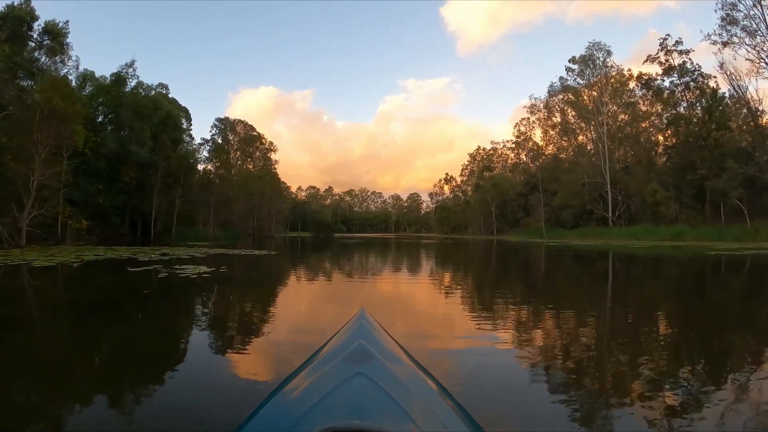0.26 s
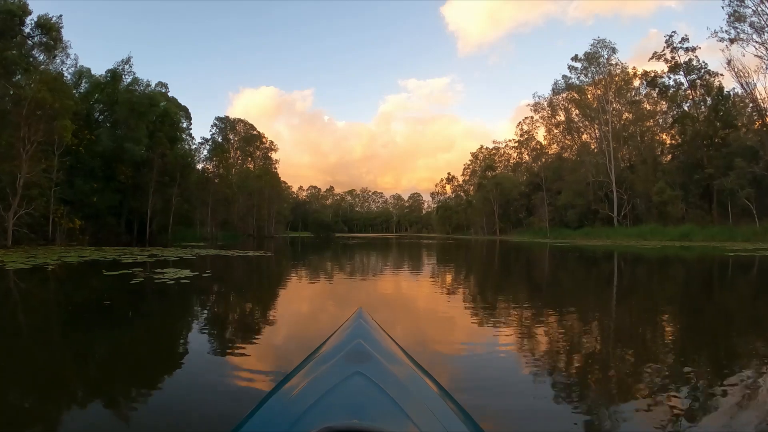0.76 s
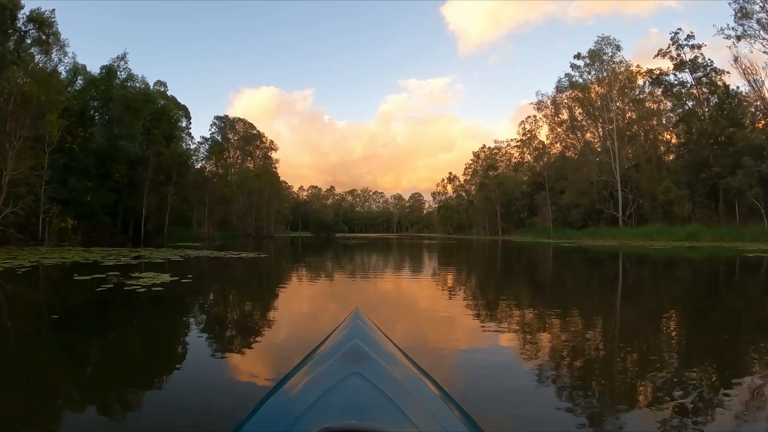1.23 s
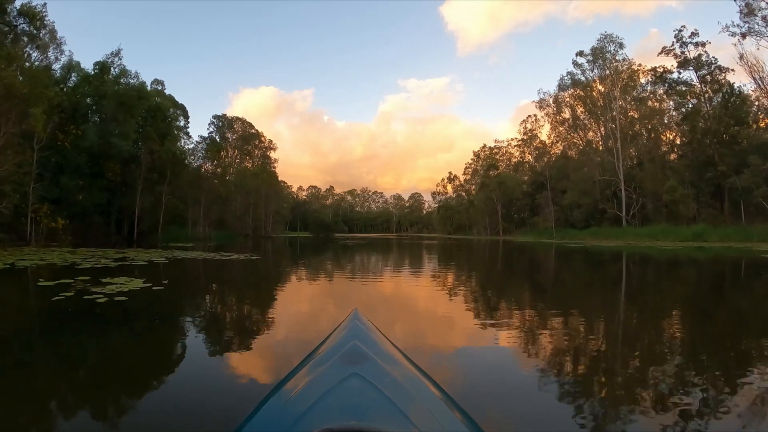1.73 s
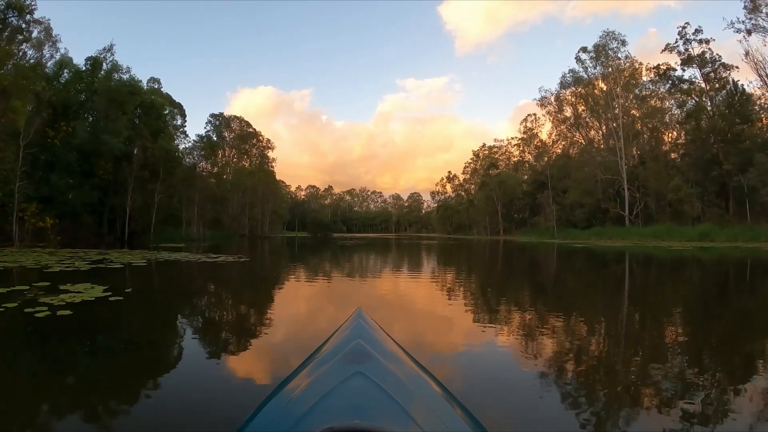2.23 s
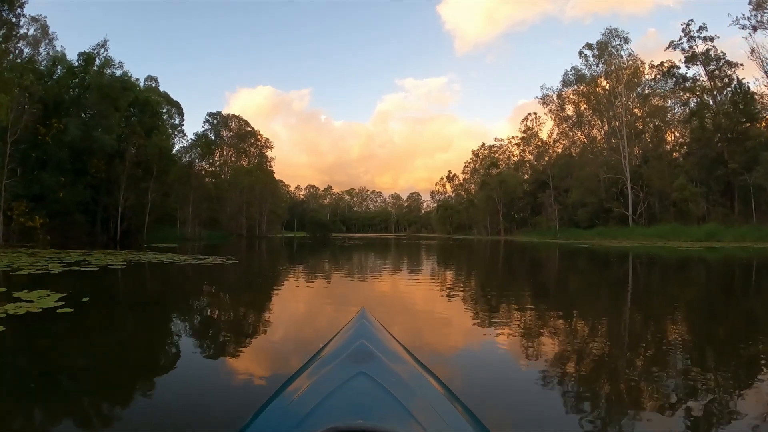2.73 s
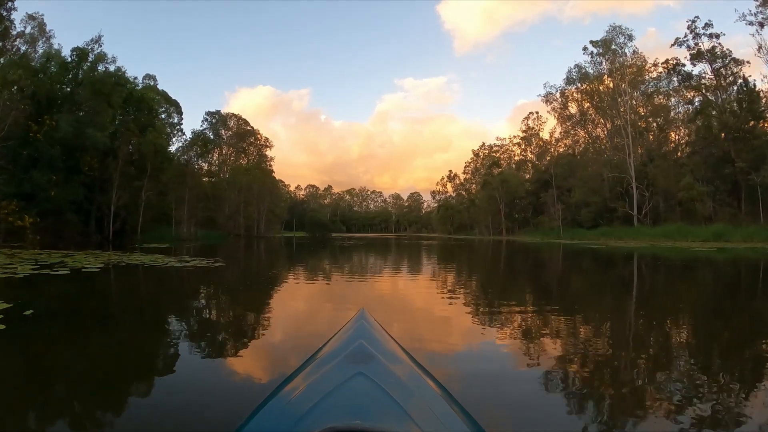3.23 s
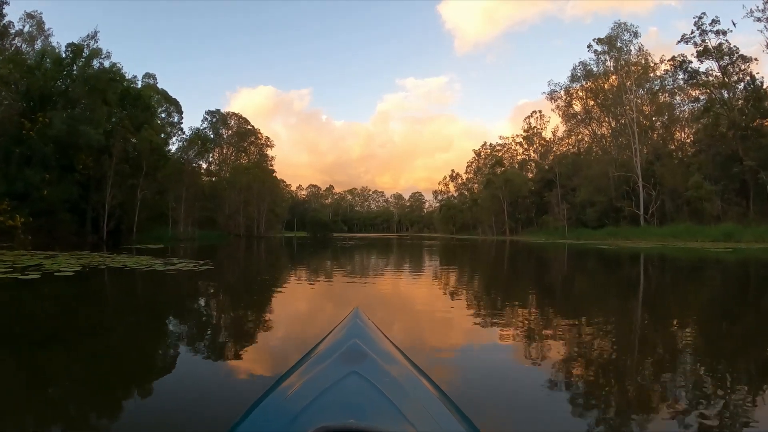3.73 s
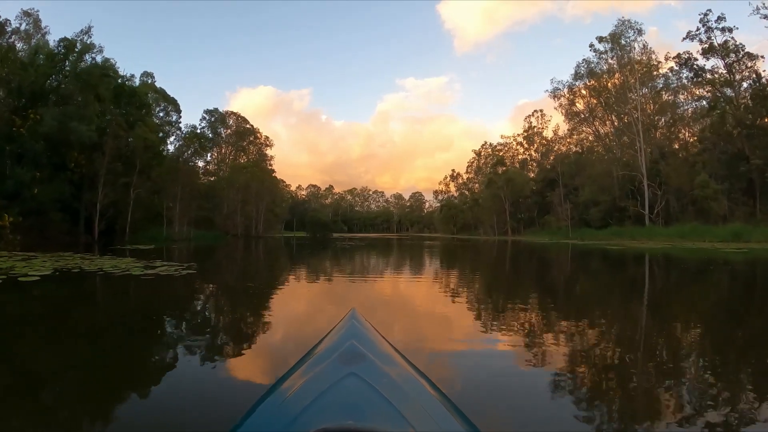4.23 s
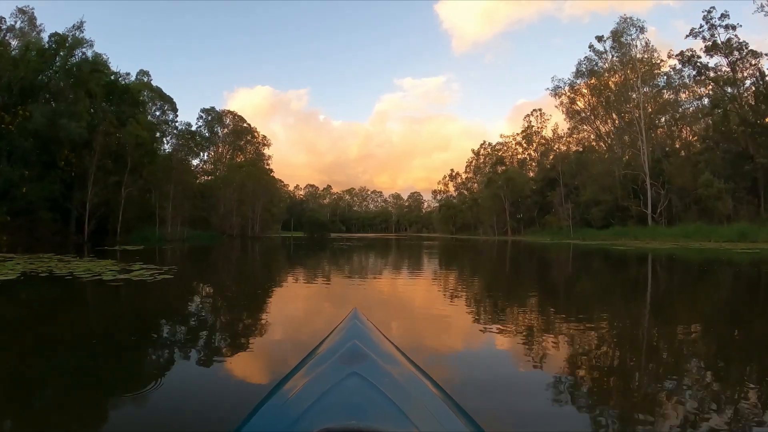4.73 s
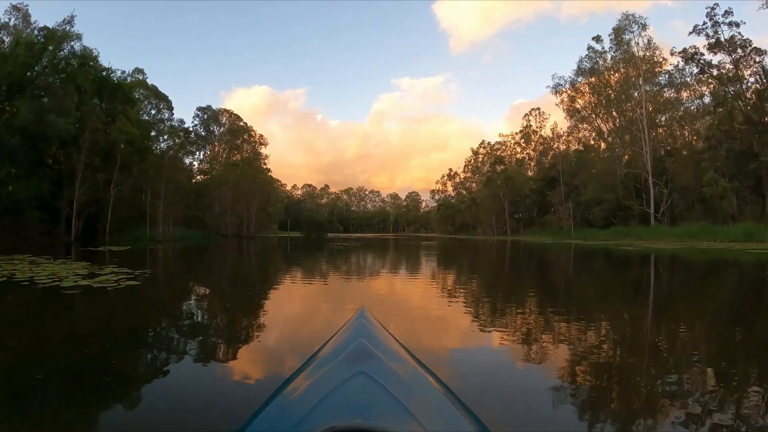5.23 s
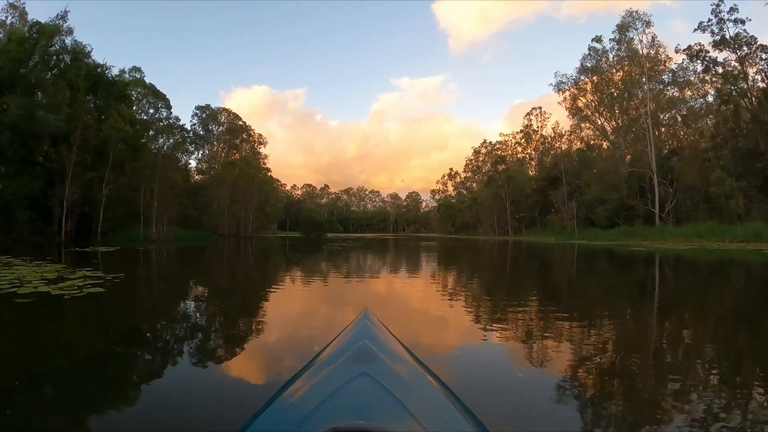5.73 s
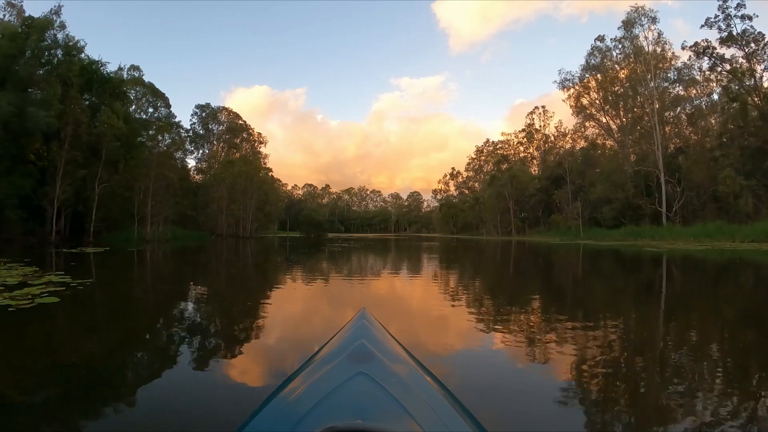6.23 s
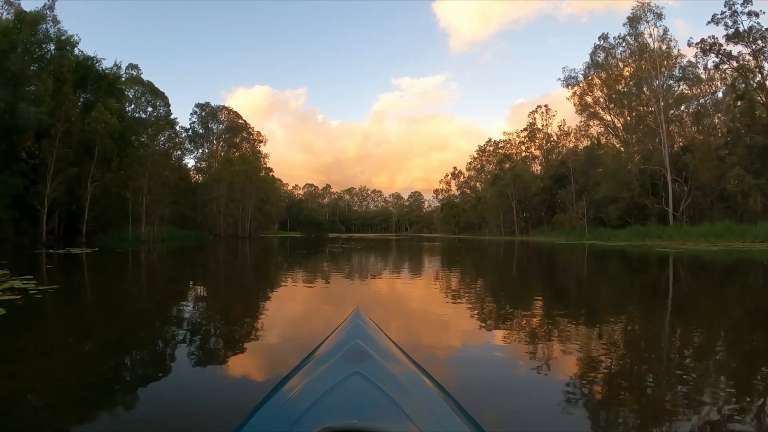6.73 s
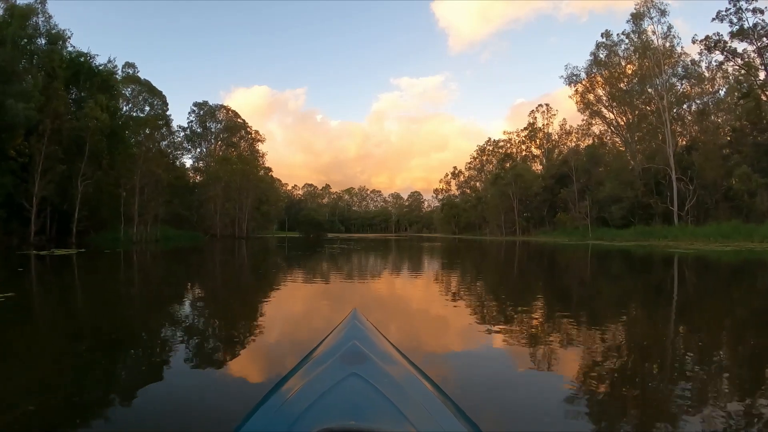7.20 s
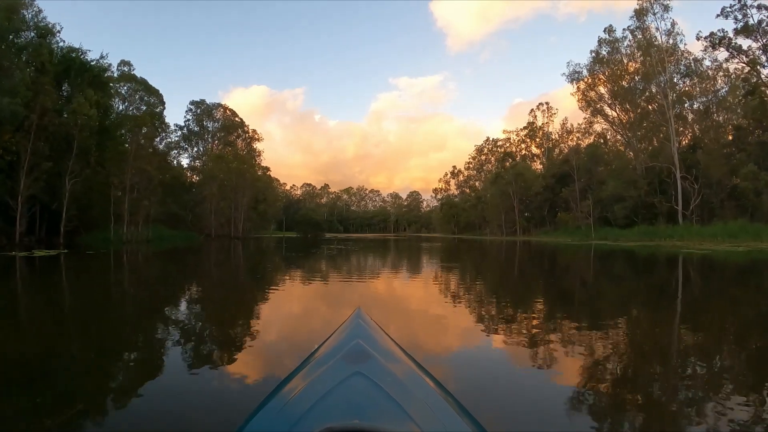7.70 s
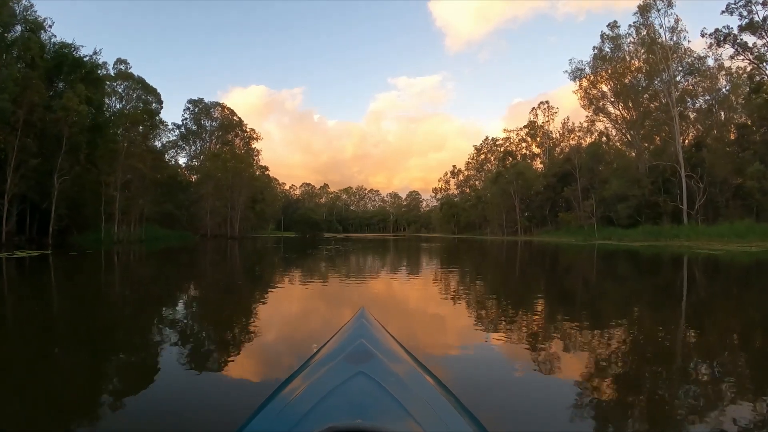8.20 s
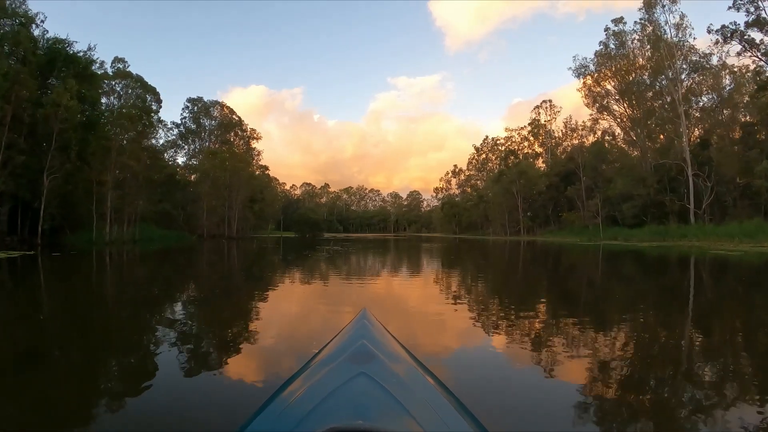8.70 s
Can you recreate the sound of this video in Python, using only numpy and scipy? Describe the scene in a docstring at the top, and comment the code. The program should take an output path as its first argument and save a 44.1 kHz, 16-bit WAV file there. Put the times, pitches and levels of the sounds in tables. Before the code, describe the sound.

A calm lake heard from a gliding kayak, close and nearly dry, over a soft low wash, faint leafy hiss and deep rumble. Small plops and gurgles open the scene around 0.3 and 1 s, while a distant parrot gives quick gliding whistles and harsh screeches until about 1.8 s, echoing from the trees. A light stroke lands at 1.75 s. Drips and fine spray trickle before a sharp, bright plop at 3.25 s, joined by more bird chirps; a faint screech follows at 4.2 s. Further crisp, bubbly strokes come at 4.5, 5.95 and 7.4 s, with drips and low sloshes against the hull between them. From 1.75 to 7.7 s a far engine wavers, its low hum rising through three gears. Dripping and a gentle slosh lead to a short stumble of hollow plastic hull knocks at 8.8 s.

```python
"""A paddle plops through the surface of a calm lake about every 1.4 s, heard from the deck of a gliding kayak.
Each trapped bubble is a fading sine that rises in pitch; splashes and wavelets are swarms of such bubbles.
Drips are tiny bubbles and puffs of noise, and near the end something bumps the hull, a set of fading tones.
A parrot screeches in gliding whistles with an echo from the trees, and a far engine climbs through its gears.
Behind it all lie a wash of shaped noise and a deep rumble."""
import sys
import numpy as np
from scipy import signal
from scipy.fft import rfft, irfft, next_fast_len
from scipy.io import wavfile
from scipy.ndimage import uniform_filter1d

SR = 44100
rng = np.random.default_rng(int(sys.argv[2]) if len(sys.argv) > 2 else 0)


def log_audio(samples):
    """Write samples as a 16-bit WAV file to the path given in sys.argv[1]."""
    # one column per channel
    frames = np.atleast_2d(samples).T
    # limit to full scale, then quantise
    limited = np.clip(frames, -1, 1)
    pcm = np.round(limited * 32767).astype(np.int16)
    wavfile.write(sys.argv[1], SR, pcm)


N = 394684  # length in samples
TIME = np.arange(N) / SR  # seconds


def gain_of(db):
    """Turns decibels into amplitude."""
    return 10 ** (np.asarray(db) / 20)


def evened(x):
    """Scales a sound to rms 1."""
    return x / np.sqrt(np.mean(x ** 2) + 1e-20)


def read(points, hz):
    """Reads a table of values by frequency, joining its points on a log-frequency axis."""
    f, value = np.transpose(points)
    return np.interp(np.log(hz + 1), np.log(f + 1), value)


def add(mix, s, sound):
    """Mixes a sound in at time s, in seconds."""
    part = mix[max(round(s * SR), 0):][:len(sound)]
    part += sound[:len(part)]


def wander(size, hz):
    """A random drift around zero, mostly slower than hz, with an rms of 1 before it is cut to size."""
    span = next_fast_len(size + SR // 2)
    f = np.fft.rfftfreq(span, 1 / SR)
    spectrum = rfft(rng.standard_normal(span)) / (1 + (f / hz) ** 4)
    return evened(irfft(spectrum))[:size]


def snap(colour, size=1024):
    """The click of water meeting water: it starts at once, has the given colour and peaks at 1."""
    log_gain = np.log(gain_of(read(colour, abs(np.fft.fftfreq(size, 1 / SR)))))
    # minimum phase puts the energy as early as this colour allows
    click = np.fft.ifft(np.exp(np.conj(signal.hilbert(log_gain)))).real
    return click / abs(click).max()


def bubble(hz, decay_ms, rise, size=4000):
    """A trapped air pocket rings and goes up in pitch (octaves per decay time) as it nears the surface."""
    t = np.arange(size) / SR
    age = t * 1000 / max(decay_ms, .1)  # in decay times
    pitch_hz = hz * 2 ** (rise * np.minimum(age, 3))
    turns = np.cumsum(pitch_hz) / SR
    onset = 1 - np.exp(-(turns / .5) ** 2)
    flow = np.sin(2 * np.pi * turns) * np.exp(-age) * onset
    return np.gradient(flow) * SR / (2 * np.pi * hz)  # pressure follows the change of flow


def grains(per_s, low_hz, high_hz, cycles, spread_db, count=28):
    """A steady random stream of small bubbles of many sizes, rms 1; each fades over a number of cycles."""
    at, pick, chance, size = rng.random((4, 20000))
    size = gain_of(spread_db * np.minimum(-np.log(1 - size), 3.5))  # many weak, few strong
    kept = chance < per_s * TIME[-1] / len(at)
    kind = np.floor(pick * count)
    out = np.zeros(N)
    for k, hz in enumerate(np.geomspace(low_hz, high_hz, count)):
        ring = bubble(hz, 1000 * cycles / hz, .04, size=1500)
        for i in np.flatnonzero((kind == k) & kept):
            add(out, at[i] * TIME[-1], size[i] * ring)
    return evened(out)


def swells(rows):
    """Amplitude of overlapping bell-shaped swells; their powers add (s, half length s, dB)."""
    t = TIME[::32]
    power = sum(gain_of(db) ** 2 * np.exp(-((t - s) / half) ** 2) for s, half, db in rows)
    return np.interp(TIME, t, np.sqrt(power))


# Bubbles trapped by the paddle and by the largest drips.
# Each row: start in seconds, approximate peak in dB, starting pitch in Hz, decay time in ms,
# snap of the surface as a share of that peak.
PLOPS = [(.079, -27, 1740, 4.5, .3), (.275, -28, 660, 3.6, .2), (.862, -30.5, 2050, 3.5, 0.49),
         (0.997, -23.5, 350, 8.5, .2), (1.034, -34, 400, 5.4, .6), (1.18, -31.5, 990, 9.9, .1),
         (1.21, -29, 510, 9.5, .1), (1.338, -30, 394, 12, .2), (1.603, -23, 1410, 7, .15),
         (1.6857, -16, 1900, 2.8, 0.22), (1.718, -22.5, 358, 8.9, 2), (1.757, -18.5, 2770, 1.9, .2),
         (1.777, -24.5, 1660, 3.5, 0.36), (2.098, -28.5, 1100, 3, .1), (3.153, -23, 4200, .8, .55),
         (3.1575, -10.5, 3700, 0.61, 0.34), (3.2313, -13.5, 1610, 2, .2), (3.237, -18.5, 2580, 1.4, 0.61),
         (3.251, -22, 1280, 5.6, .1), (3.2551, 1, 3650, .71, .17), (3.2594, -11, 1600, 2.2, 0.83),
         (3.315, -20, 637, 6.1, .1), (3.3235, -10.5, 960, 1.1, 0.13), (3.3262, -19, 684, 6.9, .1),
         (3.9175, -22, 1550, 2.3, .3), (3.97, -28, 2050, 3.3, .5), (4.349, -28.5, 1213, 10, .1),
         (4.419, -15.5, 1970, 4.2, .12), (4.4244, -19.5, 2330, 1.8, .5), (4.4765, -19.5, 347, 7.1, 1.14),
         (4.5114, -19, 1950, 2.5, .27), (4.5188, -4.5, 1970, 0.7, 0.092), (4.5188, -4.5, 1290, 0.93, .1),
         (4.5283, -12, 2300, 0.86, 0.27), (4.5294, -12, 3320, 1, .2), (4.591, -26.5, 720, 4.8, .1),
         (5.195, -30.5, 3150, 3.3, .1), (5.525, -30.5, 2150, 4, .1), (5.85, -24.5, 1620, 4.7, .3),
         (5.8783, -20, 1250, 4.3, 1.3), (5.9524, -7, 1040, 1.3, 0.42), (5.9524, -18.5, 570, 5.7, .2),
         (5.9533, -16, 4360, 1.7, 0.26), (5.9568, -11.5, 1490, 2.2, 0.88), (6.003, -19.5, 860, 2.5, 0.96),
         (6.012, -20.5, 603, 3.3, .4), (6.064, -27, 760, 5.1, 1.4), (6.4635, -22.5, 807, 1.1, 1.5),
         (6.5033, -23.5, 740, 4.5, 1.4), (6.62, -30, 1270, 5, 0.54), (6.903, -30, 1230, 5.6, .1),
         (7.296, -17.5, 328, 11.3, .1), (7.297, -20.5, 1700, 4.1, 0.34), (7.3505, -23.5, 813, 6.5, 1.2),
         (7.3837, -5.5, 1640, 2.7, .05), (7.384, -18.5, 2630, 1.5, 0.046), (7.517, -26.5, 1210, 6.2, .05),
         (8.0855, -22, 2500, 1.9, 0.48), (8.417, -24.5, 574, 5.9, .2), (8.454, -28, 1400, 1.4, 1.9),
         (8.606, -22.5, 4760, 1.7, 0.48), (8.764, -19.5, 4450, .6, 0.28)]
# Colour of a drop's snap. Each row: frequency in Hz, level in dB (only the shape counts).
SNAP = [(100, -43), (500, 8), (1500, 16.5), (4500, 7.5), (6500, -6), (8500, -54), (11000, -11),
        (15000, -65)]
PLOP_RISE = 0.022  # octaves per decay time, as a bubble nears the surface


def paddle(scatter_db=-13, scatter_s=0.0092):
    """Each cavity closes with a snap and rings; deck and blade scatter the sound."""
    out, click = np.zeros(N), snap(SNAP)
    for s, db, hz, decay_ms, share in PLOPS:
        add(out, s, gain_of(db) * bubble(hz, decay_ms, PLOP_RISE))
        add(out, s, gain_of(db) * share * click)
    t = TIME[:2048]
    scatter = rng.standard_normal(len(t)) * np.exp(-t / scatter_s) * (t > .001)
    scatter /= np.linalg.norm(scatter)
    return out + gain_of(scatter_db) * signal.oaconvolve(out, scatter)[:N]


# Paddle strokes. The last splash is faint: the hull is bumped instead.
# Each row: splash time in seconds, its half length in seconds, its rms in dB, rms of its spray in dB;
# then the trickle before it: lead in seconds, half length in seconds, rms of plinks in dB,
# rms of fine spray in dB.
STROKES = [(.3, .03, -65, -70, 0.14, 0.19, -47, -70), (1.753, 0.036, -45, -63, 0.58, 0.21, -48, -55.5),
           (3.261, 0.016, -33.5, -49.5, 0.57, 0.082, -49, -53),
           (4.52, 0.014, -29.5, -66, .45, .14, -51, -53.5),
           (5.961, 0.0066, -29.5, -56, .53, 0.22, -47.5, -59),
           (7.362, 0.026, -35.5, -52, 0.67, 0.26, -48, -55), (8.818, .02, -52, -68, 0.47, 0.42, -48, -54.5)]
# a splash is a short burst inside a longer, weaker churn (half length, level relative to the burst)
CHURN_S, CHURN_DB = 0.046, -16.5
SLOSH_FIZZ_DB = -7.5  # small bubbles of a slosh, relative to its low gurgle


def splashes():
    """Swarms of small bubbles in the water churned by each stroke and each slosh."""
    bursts = [(s, half, db) for s, half, db, *_ in STROKES]
    churn = [(s, CHURN_S, db + CHURN_DB) for s, half, db, *_ in STROKES]
    fizz = [(s, half, db + SLOSH_FIZZ_DB) for s, half, db in SLOSHES]
    swarm = grains(per_s=2200, low_hz=830, high_hz=4260, cycles=0.84, spread_db=5.5)
    return swells(bursts + churn + fizz) * swarm


# Single drops that slap the surface. Each row: start in seconds, peak in dB.
DROPS = [(0.944, -37), (1.319, -33), (1.365, -32), (1.374, -38), (2.8815, -35), (3.153, -34), (3.345, -35),
         (3.876, -32.5), (4.018, -35), (4.084, -32), (4.1685, -35), (5.8496, -32), (6.457, -25.5),
         (6.6792, -25), (6.8205, -38), (7.259, -35.5), (8.16, -38), (8.6046, -35)]
# Colour of fine spray. Each row: frequency in Hz, level in dB (only the shape counts).
SPRAY = [(300, -42), (2000, 13), (4500, 4.5), (7500, 0.5), (10500, -8.5), (13000, -17.5), (15000, -30)]
SETTLE_LAG_S, SETTLE_S, SETTLE_DB = 0.063, 0.15, -54.5  # thrown water falls back: delay, half length, rms
SPRAY_S = 0.11  # half length of the spray thrown up by a splash


def drips(patter_s=0.0066, ticks_per_s=700, spread_db=3.3):
    """Drops run off the blade before a stroke and fall back after it: plinks, crackling spray, sharp slaps."""
    click, plinking, spraying = snap(SPRAY), [], []
    for s, _, _, thrown_db, lead, half, plink_db, spray_db in STROKES:
        plinking += [(s - lead, half, plink_db), (s + SETTLE_LAG_S, SETTLE_S, SETTLE_DB)]
        spraying += [(s - lead, half, spray_db), (s, SPRAY_S, thrown_db)]
    plinks = grains(per_s=90, low_hz=1400, high_hz=4800, cycles=6.5, spread_db=2.6)
    landed = rng.random(N) < ticks_per_s / SR
    sign = rng.choice([-1, 1], N)
    strength = gain_of(spread_db * np.minimum(rng.exponential(1, N), 3.5))
    # each drop breaks into a brief puff of droplets
    puff_level = signal.oaconvolve(landed * sign * strength, signal.windows.hann(80))[:N]
    puffs = puff_level * rng.standard_normal(N)
    spray = evened(signal.oaconvolve(puffs, click)[:N])
    out = swells(plinking) * plinks + swells(spraying) * spray
    for s, db in DROPS:
        patter = rng.standard_normal(512) * np.exp(-TIME[:512] / patter_s)
        slap = np.convolve(patter, click)
        add(out, s, gain_of(db) * slap / abs(slap).max())
    return out


# Wavelets that slosh against the hull.
# Each row: time of the height in seconds, half length in seconds, rms of the low gurgle in dB.
SLOSHES = [(.3, 0.068, -46), (0.863, 0.012, -43), (1.026, 0.039, -41.5), (1.197, 0.054, -50.5),
           (1.34, 0.041, -44.5), (1.723, 0.028, -46), (3.94, 0.024, -38.5), (4.133, 0.065, -46.5),
           (6.515, .02, -42), (6.93, .06, -45.5), (8.389, 0.075, -47)]


def gurgles(blip_db=-6):
    """Large, low bubbles where the wake slaps the hull, and a few smaller ones that ring clear."""
    low = grains(per_s=180, low_hz=298, high_hz=806, cycles=2.8, spread_db=1.5)
    blips = grains(per_s=60, low_hz=600, high_hz=2200, cycles=6, spread_db=2)
    return swells(SLOSHES) * (low + gain_of(blip_db) * blips)


def ripples(lap_db=-55):
    """Wavelets lap quietly along the bow: a thin, steady stream of ringing bubbles."""
    return gain_of(lap_db) * grains(per_s=45, low_hz=450, high_hz=2600, cycles=6, spread_db=3)


# Blows on the hull. Each row: start in seconds, strength in dB, contact time in ms.
BUMPS = [(8.806, -28, 0.75), (8.8123, -23.5, 0.78), (8.8141, -18, 1.3), (8.8267, -15, 2.6),
         (8.865, -15, 5.6), (8.88, -20, 5.1), (8.925, -30.5, 5.6)]
# Ringing tones of the plastic hull.
# Each row: pitch in Hz, level in dB, time to fade by 60 dB in seconds.
HULL = [(122.7, -15, 0.48), (168, -9, 0.22), (231, 3.5, 0.046), (300, -7.5, 0.028), (405, -13, 0.018),
        (860, -5, 0.022)]


def hull():
    """A short stumble of blows on the hollow hull; longer contact sounds duller."""
    t, out = TIME[:SR // 3], np.zeros(N)
    ring = sum(gain_of(db - 60 * t / t60) * np.cos(2 * np.pi * hz * t) for hz, db, t60 in HULL)
    for s, db, contact_ms in BUMPS:
        push = np.sin(np.pi * np.minimum(t[:512] * 1000 / contact_ms, 1)) ** 2
        add(out, s, gain_of(db) * signal.oaconvolve(ring, push / push.sum()))
    return out


# Parrot notes. Each row: start in seconds, length in seconds, start pitch in Hz, end pitch in Hz,
# height of the arch in Hz, level in dB (rms of the plain whistle), harshness from 0 to 1.
PARROT = [(0.305, .027, 4450, 4400, 300, -47, 0), (0.326, 0.045, 5100, 4700, 1098, -53, 0.2),
          (0.379, .042, 3440, 3460, 0, -45.5, 0), (0.426, 0.025, 4420, 4370, 800, -41.5, 0.1),
          (0.451, 0.017, 5350, 6700, 0, -49, 0.4), (0.521, .037, 3880, 3750, 1520, -39.5, 0.26),
          (0.55, 0.043, 3780, 3620, 2, -46, 0.02), (1.065, .044, 4290, 4730, 850, -42, 0.2),
          (1.108, 0.029, 4700, 4830, 100, -42.5, 0.1), (1.205, 0.069, 4150, 4160, 100, -45, 0.58),
          (1.276, .031, 4670, 3920, 0, -46, 0.67), (1.448, 0.041, 4300, 2500, 100, -46, 0.1),
          (1.693, .1, 3390, 4200, 600, -46, 0.83), (3.163, .025, 3950, 4250, 0, -43, .15),
          (3.188, 0.022, 4310, 4060, 850, -38.5, 0.1), (3.206, 0.019, 3370, 3600, 0, -40.5, .1),
          (3.225, .018, 4300, 4150, 350, -34.5, 0.13), (3.285, .042, 5110, 4720, -4, -43, 0),
          (3.329, 0.028, 4700, 3580, 1097, -39, 0.06), (4.14, .08, 3640, 4220, 2, -54, 0.77),
          (4.218, 0.036, 5180, 5500, 500, -51, 0.7)]
NOTE_EDGE_S = 0.0028  # rise and fall of a note
ARCH_SHAPE = .7  # below 1 the arch of a note is rounder, with steeper flanks


def parrot(overtone_db=-6, air_db_per_octave=-30, shake=0.099):
    """Each note is a whistle that glides through an arch or breaks into a screech; distance dulls its overtone."""
    out = np.zeros(N)
    for s, length, start_hz, end_hz, arch_hz, db, harsh in PARROT:
        t = np.arange(0, length, 1 / SR)
        u = t / length
        arch = abs(np.sin(np.pi * u)) ** ARCH_SHAPE
        hz = start_hz + (end_hz - start_hz) * u + arch_hz * arch
        quiver = .012 * wander(len(hz), 150)
        roughness = shake * harsh * wander(len(hz), 990)
        phase = 2 * np.pi * np.cumsum(hz * (1 + quiver + roughness)) / SR
        overtone = gain_of(overtone_db + air_db_per_octave * np.log2(np.maximum(hz / 3400, 1)))
        voice = np.sin(phase) + overtone * np.sin(2 * phase)
        # harsh notes double their period
        voice += harsh * 0.49 * (np.sin(phase / 2) + np.sin(phase + phase / 2))
        voice *= 1 + .6 * harsh * wander(len(hz), 200)
        edges = np.minimum(np.minimum(t, length - t) / NOTE_EDGE_S, 1)
        add(out, s, np.sqrt(2) * gain_of(db) * voice * edges)
    # air and leaves swallow the highest treble
    return signal.sosfilt(signal.butter(6, 7600, fs=SR, output="sos"), out)


# Echo from the wooded banks. Each row: frequency in Hz, time to fade by 60 dB in seconds.
BANKS = [(200, 0.93), (1500, 0.27), (4500, 0.9), (10000, 1)]


def banks(x):
    """A diffuse tail of noise from the trees, each band dying at its own speed."""
    hz, t, z = signal.stft(rng.standard_normal(SR), SR, nperseg=256)
    fade = gain_of(-60 * t / read(BANKS, hz)[:, None])
    tail = signal.istft(z * fade, SR, nperseg=256)[1]
    return signal.oaconvolve(x, tail / np.linalg.norm(tail))[:N]


# Gears of the far engine.
# Each row: start in seconds, length in seconds, firing rate at the start in Hz (before a small jitter).
GEARS = [(1.75, .6, 132.6), (2.479, 4, 116.5), (6.421, 1.28, 113.2)]
# How well the engine carries over the water, before it wavers.
# Each row: time in seconds, rms of the firing tone in dB, rms of its octave in dB.
ENGINE_DB = [(1.75, -55, -60), (2.6, -45, -55), (3.2, -47, -43.5), (3.9, -54, -52.5), (4.6, -51, -72),
             (5.1, -58, -49), (5.5, -45.5, -56), (6.1, -64, -66), (6.55, -48, -67), (6.95, -52.5, -47),
             (7.7, -52.5, -74)]
CLIMB_HZ_PER_S = 9.6


def engine(jitter=0.0063, shift_s=0.073, waver_db=1.5):
    """Revs climb steadily in each gear; only two firing harmonics carry over the water, wavering on the way."""
    out = np.zeros(N)
    at, tone_db, octave_db = np.transpose(ENGINE_DB)
    for s, length, start_hz in GEARS:
        t = np.arange(0, length, 1 / SR)
        firing_hz = (start_hz + CLIMB_HZ_PER_S * t) * (1 + jitter * wander(len(t), 17.6))
        phase = 2 * np.pi * np.cumsum(firing_hz) / SR
        tone = gain_of(np.interp(s + t, at, tone_db)) * np.sin(phase)
        octave = gain_of(np.interp(s + t, at, octave_db)) * np.sin(2 * phase)
        throttle = np.minimum(np.minimum(t, length - t) / shift_s, 1)
        waver = gain_of(waver_db * wander(len(t), 6.4))
        add(out, s, np.sqrt(2) * waver * (tone + octave) * throttle)
    return out


# Colour of the far wash of road and woods.
# Each row: frequency in Hz, density in dB per Hz (only the shape counts).
WASH = [(20, -35), (45, -23), (80, -25), (130, -6), (180, -3.5), (270, -2), (350, -5), (500, -10),
        (1400, -15), (4000, -20), (5800, -28), (7500, -37.5), (9000, -47.5), (11000, -47.5), (14500, -68)]
# Level of the low part of the wash. Each row: time in seconds, level in dB before a fixed lift.
WASH_DB = [(0, -44), (1.6, -45), (2.2, -44), (3.6, -44), (5, -43.5), (7.1, -43.5), (7.9, -45.5), (8.3, -43)]


def wash(patchy_db=1.34, low_lift_db=1.5, hiss_db=-50):
    """Noise shaped into a distant rumble that drifts in level under a steady leafy hiss."""
    frames, hz = N // 256 + 5, np.fft.rfftfreq(1024, 1 / SR)
    a, b, patches = rng.standard_normal((3, frames, 513))
    # smoothed over time and pitch, so that soft patches of the noise stand out
    patches = uniform_filter1d(patches, size=10, axis=0)
    patches = evened(uniform_filter1d(patches, size=10, axis=1))
    z = (a + 1j * b) * gain_of(read(WASH, hz) + patchy_db * patches)

    def band(weight):
        """The part of the wash that a weighting by frequency lets through."""
        return signal.istft((z * weight).T, nperseg=1024, noverlap=768)[1][:N]

    low_share = 1 / (1 + (hz / 700) ** 2)
    # each part is scaled by the strength of one band of the wash
    low = band(low_share) / band((hz > 150) & (hz < 450)).std()
    high = band(1 - low_share) / band((hz > 2000) & (hz < 4000)).std()
    low_db = np.interp(TIME, *np.transpose(WASH_DB)) + low_lift_db
    return low * gain_of(low_db) + high * gain_of(hiss_db)


# Deep outdoor rumble. Each row: time in seconds, rms in dB.
RUMBLE = [(0, -56), (1.8, -55.5), (2.6, -61), (5, -62.5), (8.95, -62)]


def rumble():
    """A soft, deep outdoor rumble: a low band of noise that drifts slowly in level."""
    low_band = signal.butter(2, [55, 105], "band", fs=SR, output="sos")
    noise = signal.sosfilt(low_band, rng.standard_normal(N))
    return gain_of(np.interp(TIME, *np.transpose(RUMBLE))) * evened(noise)


def scene(water_echo_db=-22, bird_echo_db=-6):
    """Sums all sources: near water almost dry, the bird with the echo of the trees."""
    water = paddle() + splashes() + drips() + gurgles() + ripples() + hull()
    bird = parrot()
    echo = banks(gain_of(water_echo_db) * water + gain_of(bird_echo_db) * bird)
    return (water + bird + echo + engine() + wash() + rumble())[None]


def record(dry, notch_hz=9050, notch_q=9, low_cut_hz=35, edge_hz=15000):
    """The microphone rolls off the deep bass and its port cuts a treble notch; then the band limit."""
    coloured = signal.lfilter(*signal.iirnotch(notch_hz, notch_q, SR), dry)
    coloured = signal.lfilter(*signal.butter(2, low_cut_hz, "high", fs=SR), coloured)
    band_limit = signal.firwin(255, edge_hz, window=("kaiser", 9), fs=SR)
    return signal.oaconvolve(coloured, band_limit[None], "same")


dry = scene()
out = record(dry)
log_audio(out)
```